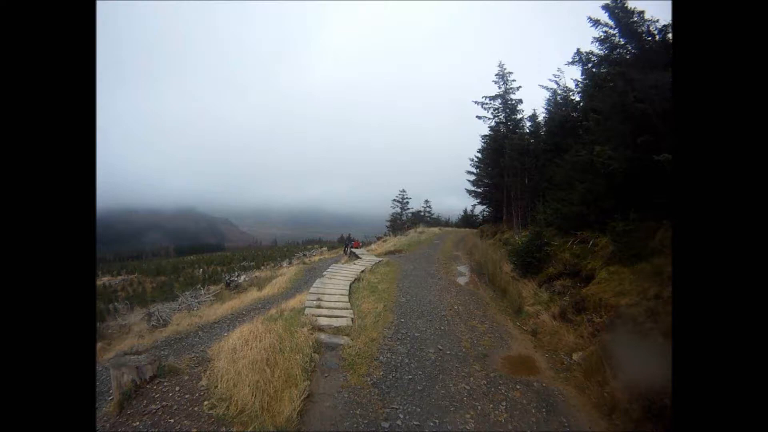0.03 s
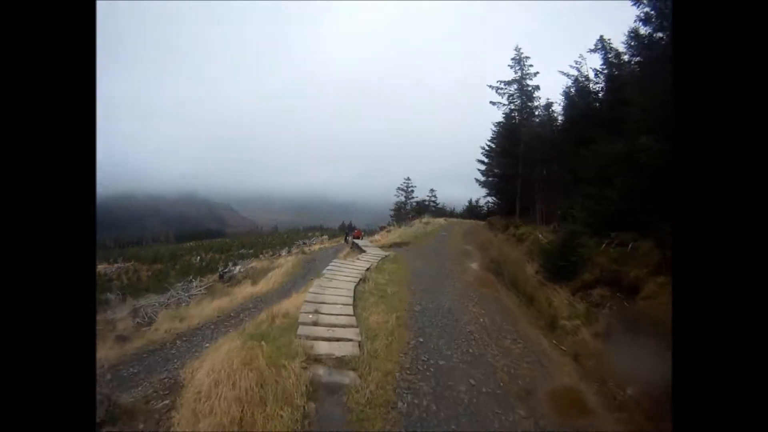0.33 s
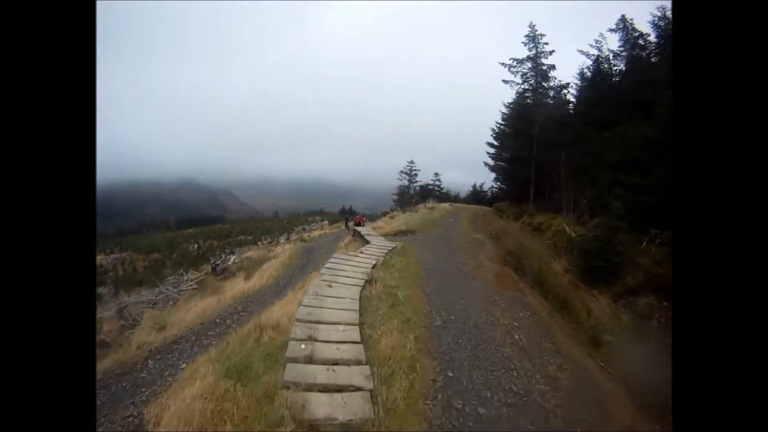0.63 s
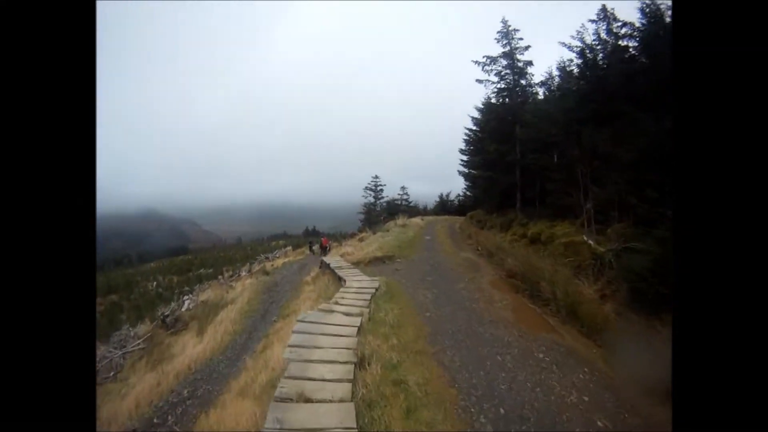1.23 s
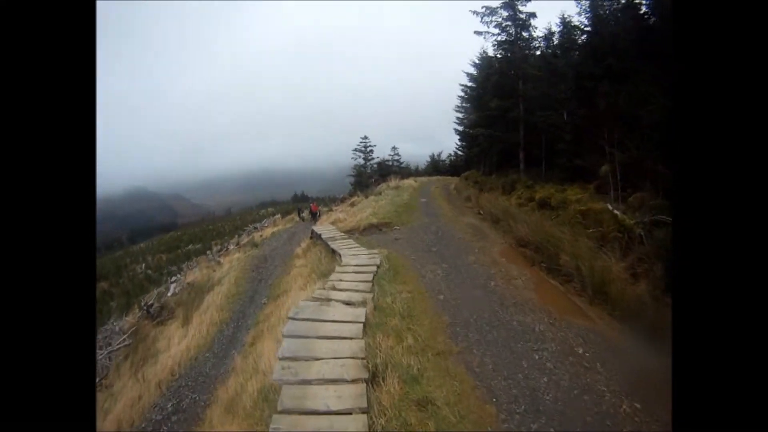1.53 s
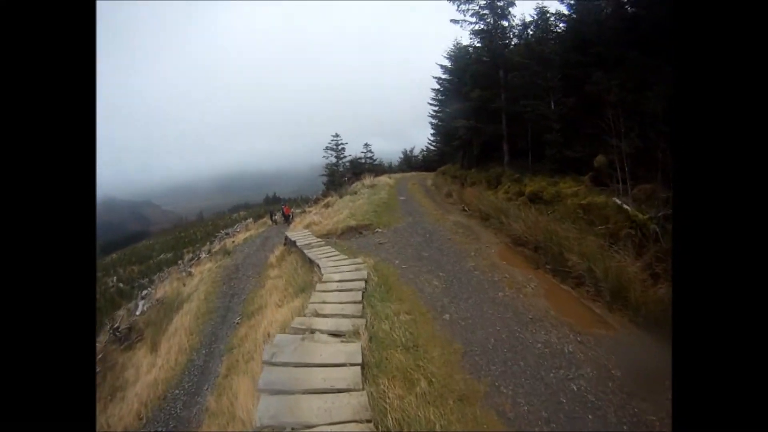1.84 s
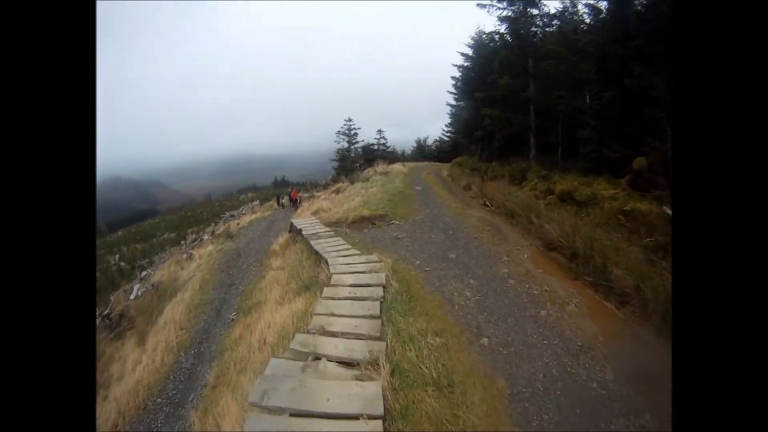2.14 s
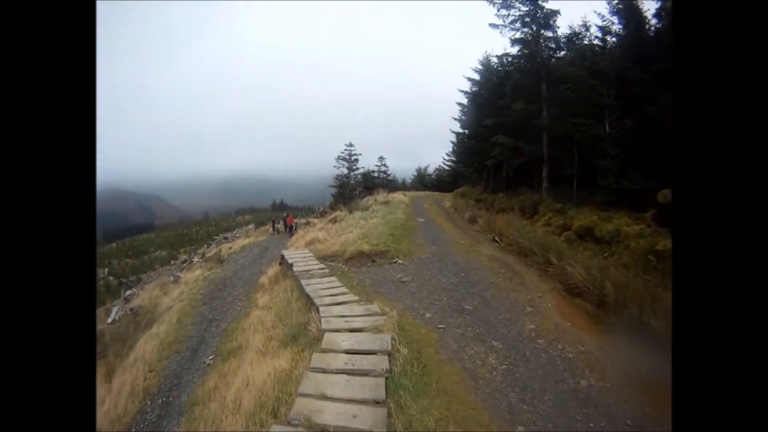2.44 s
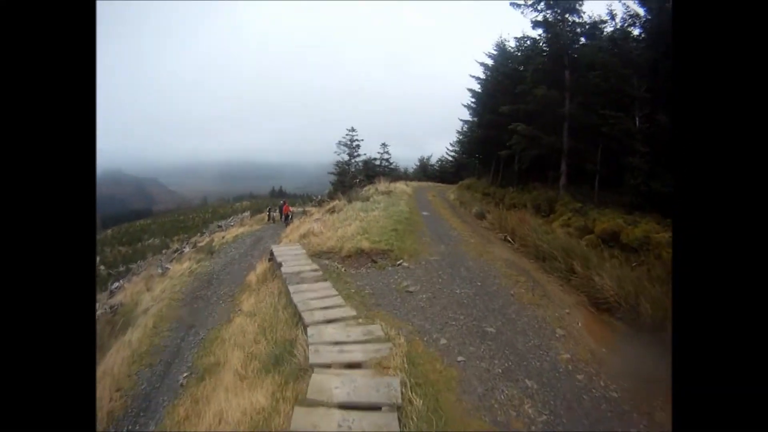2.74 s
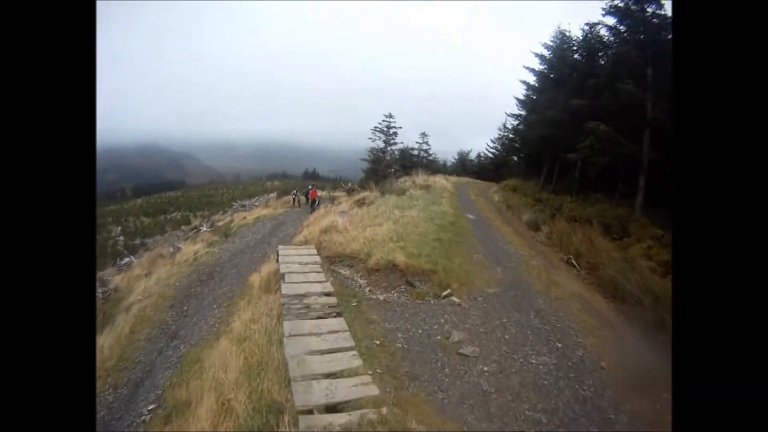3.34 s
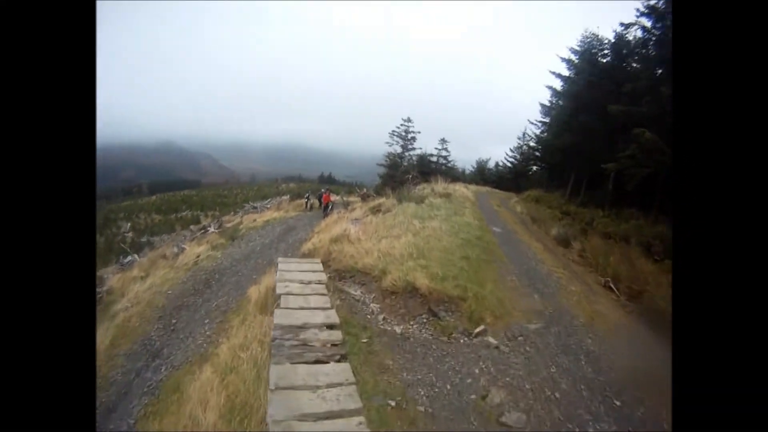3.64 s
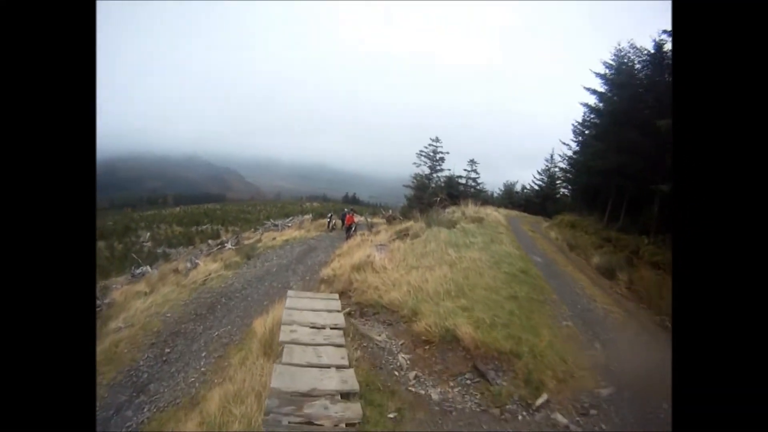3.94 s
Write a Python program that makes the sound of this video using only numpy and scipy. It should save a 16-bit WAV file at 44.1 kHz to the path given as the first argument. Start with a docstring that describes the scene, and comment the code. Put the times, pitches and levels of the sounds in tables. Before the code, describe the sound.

A mountain bike rattles along an outdoor boardwalk. A few light ticks lead into irregular bursts of chain clacks, hollow plank knocks and low camera thuds, over rolling tyres and wind rumbling on the rider's microphone.

```python
"""On a boardwalk, a mountain bike rolls along, heard from a cased camera that the rider carries.
Uneven planks jolt the bike: the camera mount thuds as a damped oscillator, while impacts excite
the modes of case, frame, planks, chain and fittings, which knock, thump, clack and chatter.
Beneath them the tyres roll, wind rumbles, loose parts buzz and friction makes the running gear
whirr. The case cuts notches in the treble."""
import sys
import numpy as np
from scipy import signal
from scipy.fft import rfft, irfft
from scipy.io import wavfile
from scipy.ndimage import uniform_filter1d

SR = 44100
rng = np.random.default_rng(int(sys.argv[2]) if len(sys.argv) > 2 else 0)


def generate_wav(sig):
    """Save sig (samples, or channels by samples) to the path in sys.argv[1] as 16-bit PCM at SR."""
    pcm = np.round(np.clip(np.atleast_2d(sig).T, -1, 1) * 32767).astype(np.int16)
    wavfile.write(sys.argv[1], SR, pcm)


N = 176400

# Resonances of the rattling camera case and frame, rung by knocks, grit and buzz.
# Each row: frequency in Hz, bandwidth in Hz, gain in dB.
KNOCK_MODES = [(268,40,-2),(1149,112,3),(1506,200,1),(1849,157,7),(1992,83,3.5),(3260,100,-11.5),(8700,420,-13),(9880,240,-5.5),(13680,190,-9.5)]


def mount_thuds():
    """Damped oscillation: each jolt swings the camera. Returns the thuds and the shaking's envelope."""
    # Each row: start in seconds, relative level in dB, ringing frequency in Hz.
    jolts = [(0.774,-30.5,22.4),(0.844,-24.5,42.4),(1.114,-31,38.7),(1.26,-36,45),(1.328,-37.5,41.5),(1.92,-31.5,41.2),(1.98,-27,45.8),(2.287,-30.5,38),(2.692,-28.5,39.1),(3.053,-26,35.8),(3.423,-25.5,34.95),(3.472,-20,80),(3.792,-29,35)]
    rise_cycles, decay_s = .88, .034
    t = np.arange(SR // 2) / SR
    thuds, shake = np.zeros(N), np.zeros(N)
    for start, db, hz in jolts:
        rise_s = rise_cycles / hz
        attack = np.sin(np.pi / 2 * np.minimum(t / rise_s, 1))
        envelope = undb(db) * attack * np.exp(-np.maximum(t - rise_s, 0) / decay_s)
        add(thuds, start, envelope * np.sin(2 * np.pi * hz * t))
        add(shake, start, envelope)
    return undb(-1.5) * thuds, shake


def chain_clatter():
    """Impact and rebound: chain and fittings clack on the frame, and links bounce in fading runs."""
    # Hard clacks. Each row: start in seconds, relative level in dB.
    hits = [(0.178,-49.5),(0.217,-44.5),(.246,-49),(0.726,-43),(0.771,-37.5),(.811,-31.5),(.827,-39.5),(0.867,-31),(0.918,-33),(.958,-37),
            (1.087,-40),(1.103,-37),(1.138,-50),(1.185,-40.5),(1.218,-39.5),(1.242,-38),(1.294,-32),(1.31,-34),(1.317,-34),(1.370,-33.5),
            (1.492,-43.5),(1.539,-42.5),(1.744,-49.5),(1.777,-45),(1.944,-30),(1.956,-32.5),(1.963,-32),(2.003,-34.5),(2.1594,-32),(2.171,-45),(2.342,-30.5),(2.359,-35),(2.456,-39),(2.587,-49),(2.674,-50.5),
            (2.711,-28.5),(2.722,-33),(2.77,-35),(2.861,-42),(2.951,-46.5),(2.984,-38),(3.016,-36),(3.023,-37),(3.104,-33),(3.125,-37),(3.167,-46),(3.181,-39),(3.334,-38),(3.373,-39.5),(3.397,-41),
            (3.438,-32.5),(3.449,-32),(3.491,-37.5),(3.4997,-31.5),(3.822,-35),(3.915,-37.5),(3.972,-42)]
    # Runs of chatter. Each row: start in seconds, length in seconds, initial level in dB.
    runs = [(.812,0.021,-34.5),(1.098,0.034,-44),(1.181,0.026,-40.5),(1.311,0.024,-38),(1.365,0.01845,-37.5),(1.941,0.031,-38),(2.183,0.028,-40.5),(2.259,0.022,-43),(2.36,0.027,-38),(2.452,0.022,-41.5),(2.716,0.032,-39),(3.113,0.026,-41.5),(3.453,0.012,-31)]
    # Modes of chain and frame. Each row: frequency in Hz, bandwidth in Hz, gain in dB.
    metal_modes = [(260,600,-13.5),(1223,69,6.5),(1522,155,5),(2115,480,9),(3527,324,11),(3740,165,0.5),(6280,370,-4),(8030,237,3.5),(9800,210,-8.5),(13550,900,-8.5)]
    # Modes of the dry crack. Each row: frequency in Hz, bandwidth in Hz, gain in dB.
    crack_modes = [(5060,1430,-1.5),(7040,400,-4.5)]
    rebound_s, rebound_db = .006, -12
    gap_s, scatter_db, fade_db = .0044, 1.5, 6.5
    delays = rebound_s * np.exp(.3 * rng.standard_normal(len(hits)))
    bounces = [(start + delay, db + rebound_db) for (start, db), delay in zip(hits, delays)]
    for start, length, db in runs:
        gaps, sizes = rng.standard_normal((2, 32))
        ages = np.cumsum(gap_s * np.exp(.2 * gaps)) - gap_s / 2
        bounces += [(start + age, db + scatter_db * size - fade_db * age / length)
                    for age, size in zip(ages, sizes) if age < length]
    clacks = strikes(hits, metal_modes, decay_s=.0016, snap=4, tail_db=-18, tail_s=.008)
    # The crack grows as the square of the clack's amplitude, so harder hits are brighter.
    crack_hits = [(start, 2 * db + 24.5) for start, db in hits]
    cracks = strikes(crack_hits, crack_modes, decay_s=.001, snap=4, tail_db=-18, tail_s=.0016)
    links = strikes(bounces, metal_modes + crack_modes, decay_s=.001, snap=3, tail_db=-18, tail_s=.001)
    link_band = signal.butter(2, (1800, 10500), "bandpass", fs=SR, output="sos")
    return undb(-1.5) * (clacks + cracks) + signal.sosfilt(link_band, links)


def plank_impacts():
    """Modal ringing: knocks on plank edges ring case and frame; loose planks thump in their low modes."""
    # Knocks. Each row: start in seconds, relative level in dB.
    knock_hits = [(.311,-47.5),(.787,-40.5),(.809,-44),(1.0,-43.5),(1.132,-41),(1.297,-45),(1.378,-41),(1.491,-40),(1.846,-45),(1.904,-44),
                  (1.968,-29.5),(2.023,-40),(2.3115,-35.5),(2.362,-30.5),(2.395,-44.5),(2.467,-39.5),(2.724,-30.5),(2.965,-41.5),(3.088,-40),(3.113,-35),(3.375,-44.5),(3.453,-29),(3.497,-32.5),(3.836,-30.5),(3.847,-29.5),(3.878,-38)]
    # Hollow plank thumps. Each row: start in seconds, relative level in dB.
    thump_hits = [(.336,-58),(.786,-43.5),(.863,-51.5),(1.482,-50),(1.942,-37.5),(2.117,-43.5),(2.308,-38.5),(2.608,-50.5),(2.713,-40),(2.98,-46),(3.05,-41.5),(3.400,-41),(3.447,-46),(3.493,-39),(3.844,-38.5),(3.893,-40.5)]
    # Modes of a plank. Each row: frequency in Hz, bandwidth in Hz, gain in dB.
    plank_modes = [(162.6,36,3.5),(268.4,23,6),(435.3,88,-4.5),(886,290,-12)]
    knocks = strikes(knock_hits, KNOCK_MODES, decay_s=.0037, snap=1.75, tail_db=-13.5, tail_s=.016)
    thumps = strikes(thump_hits, plank_modes, decay_s=.018, snap=15, tail_db=-24, tail_s=.013)
    return undb(-1.5) * knocks + undb(-1) * thumps


def wind(rolling, shake):
    """Turbulence: air rumbles on the case as the bike runs, and buffets it when the camera swings."""
    # Each row: frequency in Hz, relative spectral density in dB.
    spectrum = [(12,-10),(30,3.5),(45,-3),(62,-11),(82,-8.5),(110,-24),(200,-26.5),(2000,-78)]
    above_rolling_db, gust_db, buffet_db = 7, 3.5, -10.5
    rumble = noise(spectrum)
    gusts = rolling * undb(above_rolling_db + gust_db * drift(9.04))
    return rumble * np.hypot(gusts, undb(buffet_db) * shake)


def tyres(rolling):
    """Rolling noise: tread on wood gives a fluttering broad band; ticks of grit ring case and frame."""
    # Each row: frequency in Hz, relative spectral density in dB.
    spectrum = [(60,18),(170,5.5),(330,3.5),(720,-3),(1100,2),(2000,-3),(2700,-6),(4600,-12.5),(9500,-17),(10150,-18.5),(10600,-14.5),(13900,-17),(15200,-21)]
    tread = noise(spectrum) * rolling * undb(drift(45))
    grit = unit(ring(grains(per_s=100), KNOCK_MODES))
    return tread + undb(-66.5) * grit * unit(rolling)


def loose_buzz(shake):
    """Saturation: after each jolt, loose parts buzz in case and frame as far as their play allows."""
    lag_s, limit = .0079, undb(-34.5)
    delayed = np.interp(np.arange(N) - lag_s * SR, np.arange(N), shake)
    travel = limit * np.tanh(delayed / limit)
    return undb(-20) * travel * unit(ring(grains(per_s=1600), KNOCK_MODES))


def gear_whirr(shake):
    """Friction: fine rubbing contacts keep narrow resonances singing, and they surge with each jolt."""
    # Modes of the running gear. Each row: frequency in Hz, bandwidth in Hz, gain per pass in dB.
    modes = [(1853,163,0),(10190,210,-6),(13900,290,-6.5)]
    # Each row: time in seconds, level in dB before waver and surge.
    levels = [(.2,-74),(.85,-60.5),(1.6,-82),(2.101,-59),(2.6,-76.5),(3.6,-71)]
    waver_db, surge_db = 2.5, -28.5
    running = undb(contour(levels) + waver_db * drift(30))
    singing = ring(ring(grains(per_s=1600), modes), modes)  # two passes sharpen the peaks
    return unit(singing) * np.hypot(running, undb(surge_db) * shake)


def strikes(hits, modes, decay_s, snap, tail_db, tail_s):
    """Impact excitation: an impulse and a dying scrape drive modes that vary a little with each hit."""
    size, lead = 4096, 128  # samples
    rise_s, scatter_db, detune = .00022, 3, .024
    t = (np.arange(size) - lead) / SR
    age = np.maximum(t, 0)
    attack = np.exp(np.minimum(t, 0) / rise_s)
    decay = np.exp(-age / decay_s) + undb(tail_db) * np.exp(-age / tail_s)
    forces = rng.standard_normal((len(hits), size)) * attack * decay
    forces[:, lead] += snap
    deviations = rng.standard_normal((len(hits), len(modes), 2))
    out = np.zeros(N)
    for (start, db), force, deviation in zip(hits, forces, deviations):
        varied = [(hz + min(detune * hz, width / 2) * shift, width, gain_db + scatter_db * weight)
                  for (hz, width, gain_db), (shift, weight) in zip(modes, deviation)]
        hit = ring(force, varied)
        peak = np.sqrt(2 * uniform_filter1d(hit ** 2, size=88).max())  # amplitude of the loudest 2 ms
        add(out, start + t[0], undb(db) * hit / peak)
    return out


def ring(force, modes):
    """Modal superposition: damped resonances add, each low-passed above its own frequency."""
    f = np.fft.rfftfreq(len(force), 1 / SR)
    response = 0
    for hz, width, db in modes:
        resonance = 1j * f * width / (hz ** 2 - f ** 2 + 1j * f * width)
        response += undb(db) * resonance / (1 + .5j * f / hz)
    return irfft(rfft(force) * response, len(force))


def grains(per_s):
    """A Poisson process: tiny contacts at random moments and of random sizes."""
    return (rng.random(N) < per_s / SR) * rng.standard_normal(N)


def noise(spectrum):
    """Spectral shaping: white noise is weighted along a log-frequency curve and scaled to rms 1."""
    hz, db = np.array(spectrum).T
    f = np.maximum(np.fft.rfftfreq(N, 1 / SR), 1)
    gain = undb(np.interp(np.log(f), np.log(hz), db))
    return unit(irfft(rfft(rng.standard_normal(N)) * gain, N))


def drift(per_s):
    """Moving averages smooth random steps into a drift with a spread near 1."""
    hold = int(SR / per_s)
    steps = np.repeat(rng.standard_normal(N // hold + 1), hold)
    return 1.3 * uniform_filter1d(uniform_filter1d(steps, hold), hold)[:N]


def contour(points):
    """Linear interpolation of (seconds, value) points at every sample."""
    return np.interp(np.arange(N) / SR, *np.array(points).T)


def add(out, start_s, sound):
    """Superposition: a sound joins the mix at its start time."""
    i = int(np.clip(start_s * SR, 0, N))
    out[i:i + len(sound)] += sound[:N - i]


def undb(db):
    """Decibels to amplitude ratio."""
    return 10 ** (np.asarray(db) / 20)


def unit(x):
    """Normalisation to rms 1."""
    return x / np.sqrt(np.mean(x ** 2))


def scene():
    """Superposition at the camera: all sources add in one channel, linked by rolling and shaking."""
    # Strength of the rolling. Each row: time in seconds, level in dB.
    rolling_levels = [(0,-60),(.5,-59),(.88,-55.5),(1.35,-56),(1.7,-59.5),(2.05,-56.5),(2.66,-58.5),(2.77,-53.5),(2.87,-60.5),(3.1,-54),(3.299,-59),(3.5,-59.5),(4,-55.5)]
    rolling = undb(contour(rolling_levels))
    thuds, shake = mount_thuds()
    background = wind(rolling, shake) + tyres(rolling) + loose_buzz(shake) + gear_whirr(shake)
    return (thuds + plank_impacts() + chain_clatter() + background)[None]


def record(dry):
    """Filtering: the case notches the treble, a low-pass cuts the top, and the first moment is silent."""
    # Notches of the case. Each row: centre in Hz, half-width in Hz, depth in dB.
    notches = [(6057,460,8),(11900,900,10.5)]
    silent_s, cutoff_hz = .074, 15200
    f = np.fft.rfftfreq(N, 1 / SR)
    loss_db = sum(db * np.exp(-((f - hz) / width) ** 2) for hz, width, db in notches)
    heard = irfft(rfft(dry) * undb(-loss_db), N)
    heard *= np.arange(N) >= silent_s * SR
    return signal.sosfilt(signal.ellip(8, .2, 70, cutoff_hz, fs=SR, output="sos"), heard)


dry = scene()
out = record(dry)
generate_wav(out)
```